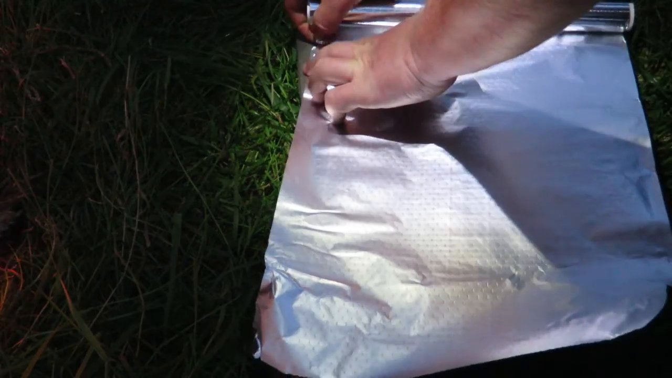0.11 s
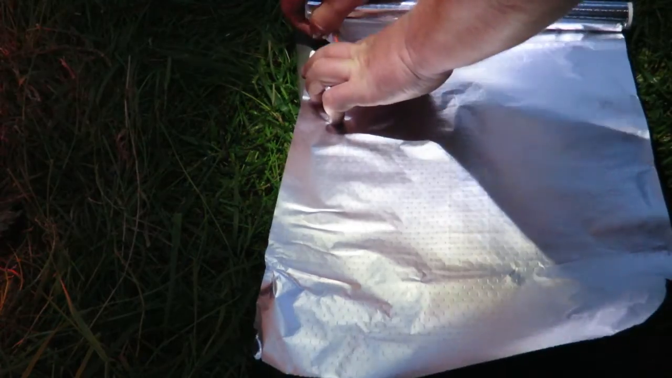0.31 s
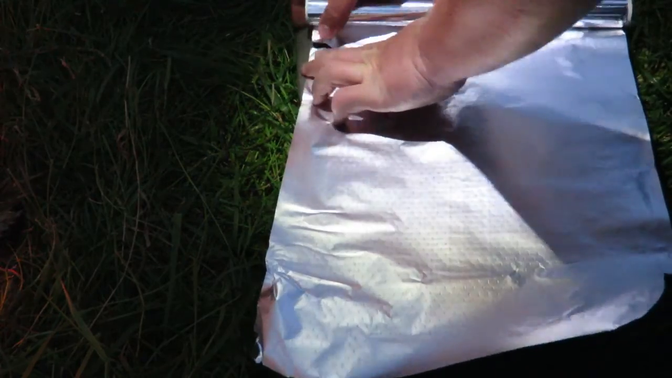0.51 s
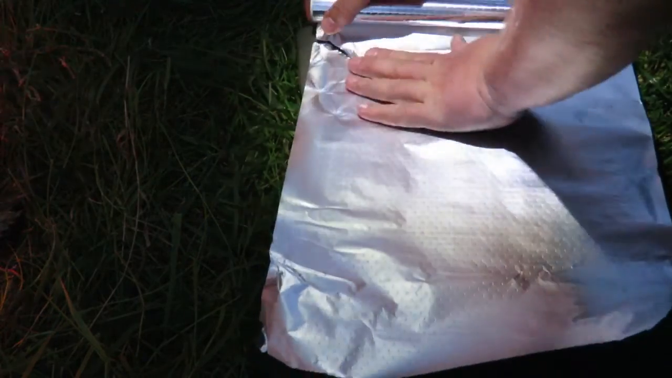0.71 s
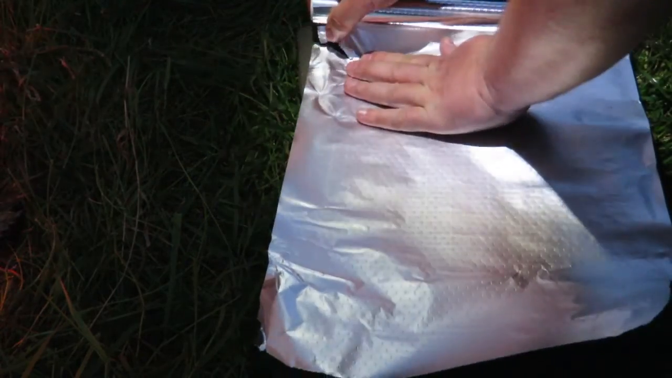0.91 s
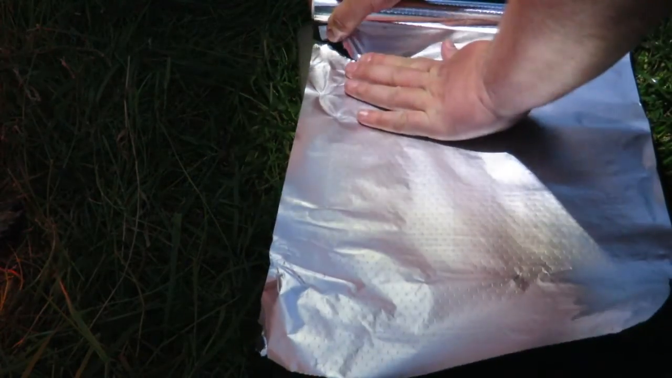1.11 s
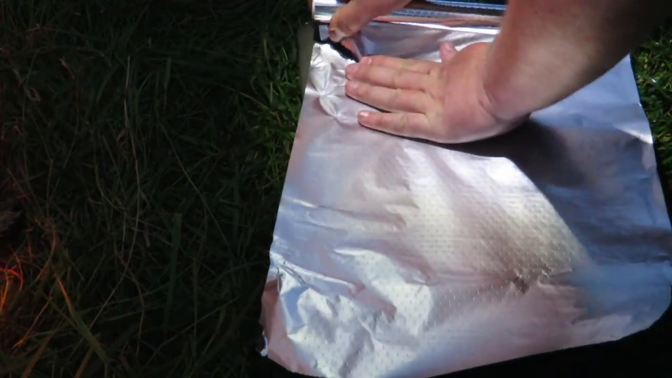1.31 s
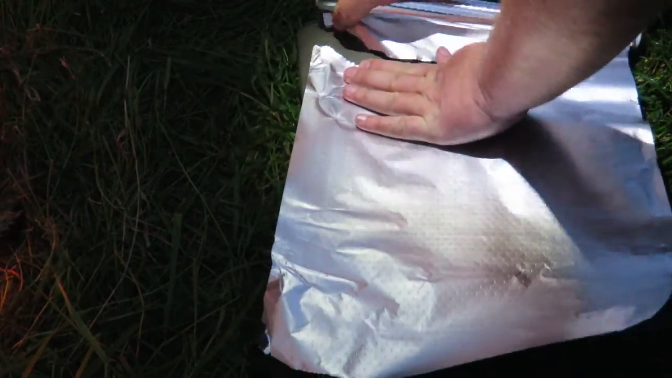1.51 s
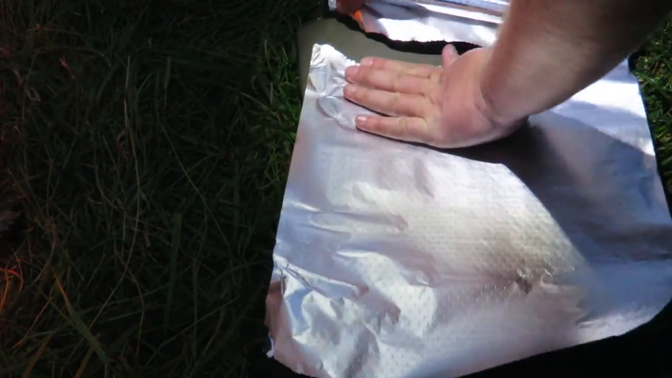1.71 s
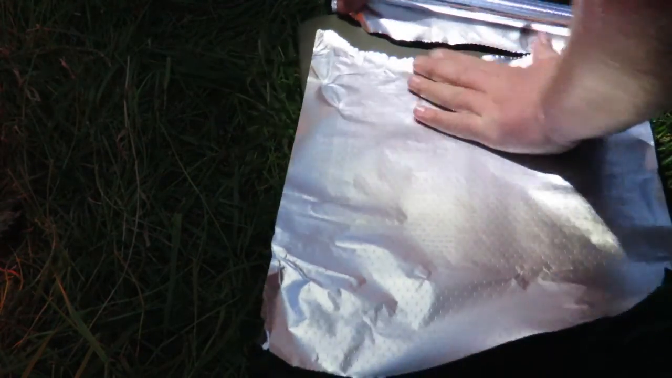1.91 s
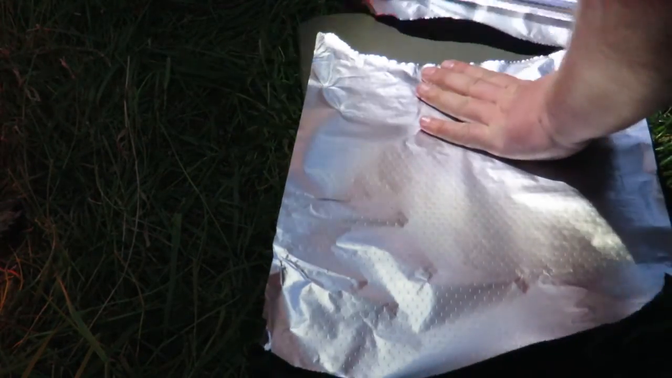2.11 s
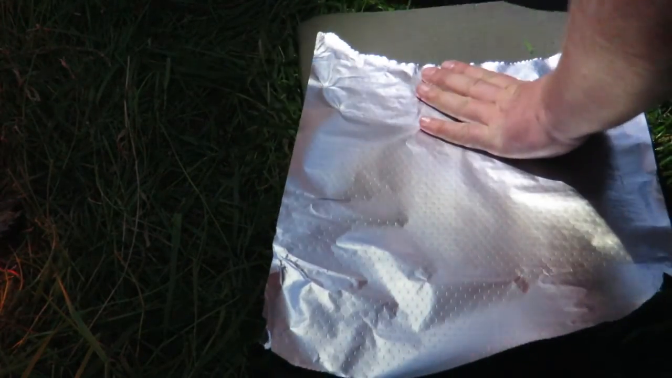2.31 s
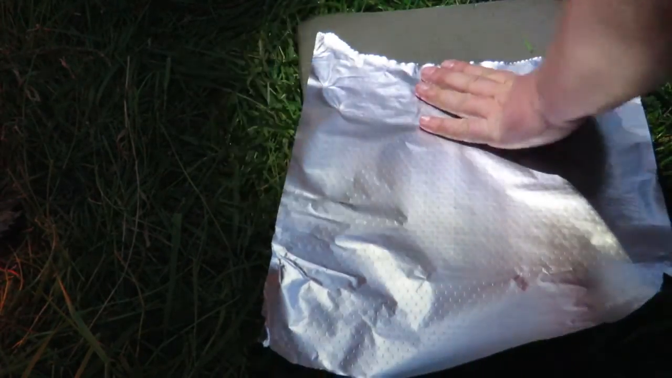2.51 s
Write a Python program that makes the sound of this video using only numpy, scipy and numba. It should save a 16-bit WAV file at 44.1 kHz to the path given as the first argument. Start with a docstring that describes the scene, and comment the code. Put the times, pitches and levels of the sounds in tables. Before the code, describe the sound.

Aluminium foil handled very close to the microphone outdoors: sharp irregular crackles and snaps, a brief lull, denser crinkling, then a smoother tearing rustle that drops to a few faint ticks over soft low rumble.

```python
"""A hand tears and smooths thin aluminium foil outdoors, close to the microphone.
Dense crackle is thousands of damped sine pops; lone snaps are noise cracks with short rings.
After each the sheet shimmers briefly, as band noise with decaying energy; a few damped sines thump.
A faint, unsteady outdoor rumble is coloured noise; more noise of opposite sign in the two channels adds width.
"""
import sys
import numpy as np
from scipy import signal
from scipy.fft import rfft, irfft
from scipy.io import wavfile
from scipy.ndimage import uniform_filter1d
from numba import njit

SR = 44100
rng = np.random.default_rng(int(sys.argv[2]) if len(sys.argv) > 2 else 0)


def bounce(signal):
    """Save signal as a 16-bit WAV file at the path given by the first command-line argument."""
    frames = np.transpose(np.atleast_2d(signal))
    limited = np.clip(frames, -1, 1)
    pcm = np.round(limited * 32767).astype(np.int16)
    wavfile.write(sys.argv[1], SR, pcm)


def amplitude_ratio(level_db):
    """Convert a level in decibels to the matching linear amplitude (field) ratio."""
    exponent = np.asarray(level_db, float) / 20
    return 10 ** exponent


N = 116865

# lone buckles of the foil: t/s, relative level/dB, ring of the patch f/Hz, ring re crack/dB
BUCKLES = [(0.012, -13, 1260, -7), (0.063, -23.5, 3330, -3), (0.115, -13, 1710, -7),
           (0.142, -15.5, 4000, 0), (0.222, -16.5, 1590, -6.5), (0.244, 1.5, 2430, -16),
           (0.257, -14, 4830, 3), (0.263, -6, 2970, -3.5), (0.272, -7.5, 4960, -7), (0.284, -13, 1560, -4),
           (0.314, -19, 1780, -1), (0.3365, -13.5, 4100, -3), (0.349, -9.5, 1400, -7.5),
           (0.354, -22, 3950, 6), (0.371, -20, 4540, 6), (0.399, -5.5, 5200, 3.5), (0.4024, -6, 5100, 4),
           (0.405, -7.5, 1550, -1.5), (0.423, -21, 5660, -3), (0.432, -4.5, 1530, -12.5),
           (0.458, -6, 4400, -19), (0.592, -15, 4540, -5), (0.6058, -8, 5000, -5), (0.609, -13.5, 3560, 0),
           (0.656, -9, 3830, -3), (0.66, -11.5, 4000, 3.5), (0.721, -6.5, 3200, -4), (0.75, -9, 6000, -25),
           (0.772, -13, 5050, -16), (0.87, -15.5, 2870, -0.5), (0.949, -2, 2840, 0),
           (0.98, -7.5, 1880, -2.5), (1.033, -11, 1510, -3), (1.089, -12, 2320, -5),
           (1.0993, -6, 1960, -8.5), (1.124, -7.5, 2020, -3.5), (1.133, -14.5, 1770, 6.5),
           (1.138, -13, 2960, -1), (1.218, -11, 3530, -12), (1.233, -19.5, 3330, 6.5),
           (1.242, -2.5, 2990, -5), (1.278, -5.5, 3600, -5), (1.34, -4, 1560, -11.5),
           (1.3481, -2, 1780, -6.5), (1.408, -24, 5500, -6), (1.414, -16.5, 4970, -3),
           (1.441, -7.5, 5870, -12), (1.4694, -9.5, 3800, -6), (1.512, -23, 1420, 2.5),
           (1.5285, -17.5, 3090, -0.5), (1.554, -3.5, 2980, 4.5), (1.561, -6.5, 3500, 7),
           (1.687, -7.5, 4500, -5), (1.912, -9, 6300, 3), (2.147, -3, 1500, -18), (2.1895, -11, 5200, -26),
           (2.305, -3, 5430, -13), (2.482, -22.5, 3020, -16), (2.519, -24, 1770, -8),
           (2.536, -26, 1650, -9), (2.556, -17, 1850, -5), (2.591, -18, 3300, -15),
           (2.6135, -24, 1850, -12)]
CRACK_DELAY_S = 0.0006  # from table time to onset


def colour(x, table):
    """Filter by (f/Hz, gain/dB) points, interpolated over log frequency."""
    hz, db = np.array(table, float).T
    f = np.maximum(np.arange(len(x) // 2 + 1) * SR / len(x), 1)
    gain = amplitude_ratio(np.interp(np.log(f), np.log(hz), db))
    return irfft(rfft(x) * gain, len(x))


def level(x, db):
    """Set the rms."""
    return x * amplitude_ratio(db) / np.sqrt(np.mean(x ** 2))


@njit
def rings(out, start, hz, cycles, size, phase):
    """Add damped sines; each falls to 1/e of its size in the given number of cycles."""
    y = out.copy()
    for k in range(len(start)):
        p = np.exp((2j * np.pi - 1 / cycles) * hz[k] / SR)
        z = size[k] * np.exp(1j * phase[k])
        stop = min(len(y), start[k] + int(6 * cycles * SR / hz[k]))
        for i in range(start[k], stop):
            y[i] += z.imag
            z *= p
    return y


def cascades(at, power, decay_s):
    """Power that jumps at each start and decays exponentially."""
    kick = np.zeros(N)
    np.add.at(kick, at, power)
    return signal.lfilter([1], [1, -np.exp(-1 / (decay_s * SR))], kick)


def walk(rate_hz):
    """Random levels held 1 / rate_hz and slewed; spread near 1."""
    k = int(SR / rate_hz)
    held = np.repeat(rng.standard_normal(N // k + 1), k)
    return 1.5 * uniform_filter1d(held, k // 2 + 1)[:N]


def crackle():
    """Tiny creases pop, denser and louder as the hand works harder, in random flurries and after snaps."""
    # hand motion: t/s, relative crackle level/dB, tilt/(dB/octave) (positive = small bright creases)
    motion = [(0.0, -34, 0.54), (0.052, -46.5, 0.5), (0.083, -30.5, 0.21), (0.111, -42.5, 1.5),
              (0.12, -24.5, 0.79), (0.135, -37.5, 1.3), (0.149, -27.5, 1.1), (0.214, -40, 0.76),
              (0.238, -35, 1), (0.248, -28, 0.61), (0.269, -26.5, 0.75), (0.31, -27, 0.55),
              (0.32, -30, 0.65), (0.326, -40, 0.98), (0.351, -25, 0.5), (0.365, -44, 1.8),
              (0.372, -19, 0.17), (0.395, -25, 0.33), (0.402, -14, 0.64), (0.431, -20.5, 4.2),
              (0.551, -33, 2.2), (0.609, -27, 0.35), (0.651, -30, 1.1), (0.661, -27, 1.4),
              (0.68, -35, 0.43), (0.697, -31.5, 3), (0.792, -28.5, 3.4), (0.857, -28.5, 2.4),
              (0.915, -18.5, 3), (0.954, -21, 0.25), (0.995, -29.5, 0.77), (1.02, -19.5, 0.96),
              (1.054, -29.5, 0.85), (1.097, -30, 0.49), (1.116, -56, 1.1), (1.123, -46, 1.3),
              (1.132, -24.5, 0.79), (1.209, -22, 1.3), (1.238, -23, 0.39), (1.245, -14.5, 1),
              (1.269, -24, 1.5), (1.307, -22.5, 3), (1.331, -30, 0.45), (1.345, -29, 0.35),
              (1.358, -40, 0.23), (1.382, -24.5, 0.4), (1.401, -36, 0.5), (1.421, -21.5, 0.67),
              (1.452, -33, 0.62), (1.475, -23.5, 1), (1.487, -34.5, 0.6), (1.538, -40, 0.35),
              (1.546, -34, 0.37), (1.562, -12, 1.7), (1.613, -18.5, 4.2), (1.671, -24, 2.3),
              (1.695, -20, 2.5), (1.763, -20.5, 2.7), (1.812, -17.5, 4.7), (1.874, -26.5, 3.3),
              (1.912, -22, 6.7), (1.958, -30, 5), (2.019, -27, 3.3), (2.1, -16, 4.5), (2.126, -28, 4.2),
              (2.186, -20, 1.5), (2.197, -17.5, 3.2), (2.214, -20.5, 2.9), (2.227, -15, 3.9),
              (2.294, -26.5, 0.4), (2.359, -18, 2.9), (2.387, -24, 3.1), (2.42, -40, 0.35),
              (2.476, -54, 0.5), (2.487, -38.5, 4.4), (2.51, -53, 1.8), (2.522, -39, 3.4),
              (2.556, -42, 0.52), (2.559, -30.5, 7.8), (2.584, -39.5, 3.1), (2.606, -38, 2.8),
              (2.619, -31.5, 4.8), (2.649, -38, 1.1)]
    pops_per_s, spread_db, biggest_db = 18000, 2.9, 12  # pops before thinning
    low_hz, high_hz, pivot_hz = 242, 15000, 3020
    grain_cycles, crackle_db = 1.26, -5.5
    dense_db, thinning = -24, 0.19  # below dense_db fewer pops, each larger to hold the power
    flurry_db, flurries_per_s, flurry_s = 0, 130, 0.004
    after_db, after_s = -19, 0.0039  # crackle that a snap sets off, re its tabled level
    t, motion_db, motion_tilt = np.array(motion).T

    u = rng.random((int(pops_per_s * N / SR), 5))
    at = (u[:, 0] * N).astype(np.int64)
    hz = low_hz * (high_hz / low_hz) ** u[:, 1] ** 0.3897
    size = amplitude_ratio(np.minimum(-spread_db * np.log(1 - u[:, 2]), biggest_db)) * np.sqrt(hz / pivot_hz)
    size = size / np.sqrt(np.sum(size ** 2 * grain_cycles * SR / hz / 4) / N)  # unit rms overall

    start = rng.random((int(flurries_per_s * N / SR), 2))
    flurry_at = (start[:, 0] * N).astype(np.int64)
    flurry_power = -amplitude_ratio(2 * flurry_db) * np.log(1 - start[:, 1])
    flurry = 1 + cascades(flurry_at, flurry_power, flurry_s)

    snap_s, snap_db = np.array(BUCKLES).T[:2]
    snap_at = ((snap_s + CRACK_DELAY_S) * SR).astype(np.int64)
    after = cascades(snap_at, amplitude_ratio(2 * (snap_db + after_db)), after_s)

    hand_power = amplitude_ratio(2 * np.interp(at / SR, t, motion_db))
    db = 10 * np.log10(hand_power * flurry[at] / flurry.mean() + after[at])
    tilt = np.interp(at / SR, t, motion_tilt)
    share = np.minimum(amplitude_ratio(thinning * (db - dense_db)), 1)
    kept = (u[:, 4] < share) / np.sqrt(share)
    gain = amplitude_ratio(crackle_db + db + tilt * np.log2(hz / pivot_hz)) * kept
    sign = np.sign(u[:, 3] - 0.5)
    return rings(np.zeros(N), at, hz, grain_cycles, size * gain * sign, 0 * hz)


def snaps():
    """Each buckle is a noise crack a few ms long, thinner for small patches, plus a short ring."""
    snap_db, ring_cycles = -2, 2.38
    rise_s, decay_s = 0.0002, 0.0011
    low_share = 0.55  # crack high-pass corner re ring pitch
    t, db, hz, ring_db = np.array(BUCKLES).T
    at = ((t + CRACK_DELAY_S) * SR).astype(np.int64)
    s = np.arange(400) / SR
    envelope = (1 - np.exp(-s / rise_s)) * np.exp(-s / decay_s)
    cracks = rng.standard_normal((len(t), len(s))) * envelope
    for k, f in enumerate(hz):
        sos = signal.butter(2, low_share * f, "highpass", fs=SR, output="sos")
        cracks[k] = signal.sosfilt(sos, cracks[k])
    # equal energy for all; 2.6 allows for the noise peaks
    cracks = cracks / np.sqrt(np.sum(cracks ** 2, axis=1) / (decay_s * SR))[:, None] / 2.6
    out = np.zeros(N + len(s))
    np.add.at(out, at[:, None] + np.arange(len(s)), cracks * amplitude_ratio(db + snap_db)[:, None])
    return rings(out[:N], at, hz, ring_cycles, amplitude_ratio(db + snap_db + ring_db), 0 * hz)


def shimmer(x):
    """The sheet's dense modes: each octave's energy lingers as noise, with its own decay time."""
    # decay of the sheet: f/Hz, T60/s
    sheet_t60 = [(300, 0.03), (1500, 0.088), (5000, 0.025), (14000, 0.01)]
    shimmer_db = -7.5
    hz, t60_s = np.array(sheet_t60).T
    tail = 0
    for f in 220 * 2.0 ** np.arange(7):
        sos = signal.butter(2, [f / 2 ** 0.5, f * 2 ** 0.5], "bandpass", fs=SR, output="sos")
        keep = amplitude_ratio(-120 / SR / np.interp(np.log(f), np.log(hz), t60_s))  # energy kept per sample
        energy = signal.lfilter([1 - keep], [1, -keep], signal.sosfilt(sos, x) ** 2)
        noise = level(signal.sosfilt(sos, rng.standard_normal(N)), 0)
        tail = tail + np.sqrt(energy) * noise
    return amplitude_ratio(shimmer_db) * tail


def flaps():
    """The whole sheet flexes with short low thumps, as damped sines."""
    # thumps: t/s, level/dB, f/Hz
    thumps = [(0.273, -44, 131), (0.384, -25, 177), (0.952, -32, 206), (1.504, -37, 102), (1.513, -19, 706),
              (1.571, -24.5, 213), (2.211, -17.5, 517), (2.624, -33.5, 91)]
    t, db, hz = np.array(thumps).T
    return rings(np.zeros(N), (t * SR).astype(np.int64), hz, 2.04, amplitude_ratio(db), 0 * hz)


def outdoor_rumble():
    """Coloured noise whose level wanders at random."""
    # rumble spectrum: f/Hz, relative density/dB
    rumble_tone = [(20, -5), (40, -11.5), (80, 0.7), (150, -0.5), (300, -10.5), (1500, -10.5), (4000, -19),
                   (8000, -43), (15500, -50)]
    rumble_db, wander_db, wander_hz = -44.5, 3.7, 7.3
    noise = level(colour(rng.standard_normal(N), rumble_tone), 0)
    return noise * amplitude_ratio(rumble_db + wander_db * walk(wander_hz))


def side_noise():
    """Steady coloured noise, opposite in sign in the two channels."""
    # side spectrum: f/Hz, relative density/dB
    side_spectrum = [(20, -30), (60, -23), (200, -1), (500, -0.5), (1200, -14), (4000, -17), (8000, -23.5),
                     (15500, -15)]
    noise = level(colour(rng.standard_normal(N), side_spectrum), -64)
    return noise * np.array([[1], [-1]])


def scene():
    """Foil in the middle, rumble under it, a trace of width."""
    # tone of the foil: f/Hz, gain/dB
    foil_tone = [(40, -45), (120, -7.5), (300, -0.5), (700, 5.5), (1500, 3.5), (2500, 1.5), (4000, 5),
                 (6000, 0.5), (10000, -4.5), (13000, -2.5), (16000, -9.5)]
    snap_tail_db = -5  # snaps' share in the shimmer
    pops = colour(crackle(), foil_tone)
    cracks = colour(snaps(), foil_tone)
    tail = shimmer(pops + amplitude_ratio(snap_tail_db) * cracks)
    return pops + cracks + tail + flaps() + outdoor_rumble() + side_noise()


def low_pass(x):
    """Removes everything above the highest recorded frequency."""
    return signal.sosfilt(signal.butter(12, 17000, fs=SR, output="sos"), x)


def record(dry):
    """The capsule resonates in the treble and loses deep bass; loud peaks are rounded, the top is cut."""
    mic_hz, mic_width_hz, mic_db = 8180, 1110, 8  # mic_db: gain of the resonant band added to the mix
    bass_cut_hz, top_hz, ceiling = 40, 15650, 0.95
    peak = signal.lfilter(*signal.iirpeak(mic_hz, mic_hz / mic_width_hz, fs=SR), dry)
    body = signal.sosfilt(signal.butter(2, bass_cut_hz, "highpass", fs=SR, output="sos"), dry)
    x = ceiling * np.tanh((body + amplitude_ratio(mic_db) * peak) / ceiling)
    mix = signal.sosfilt(signal.ellip(12, 0.2, 100, top_hz, fs=SR, output="sos"), x)
    return low_pass(mix)


dry = scene()
out = record(dry)
bounce(out)
```